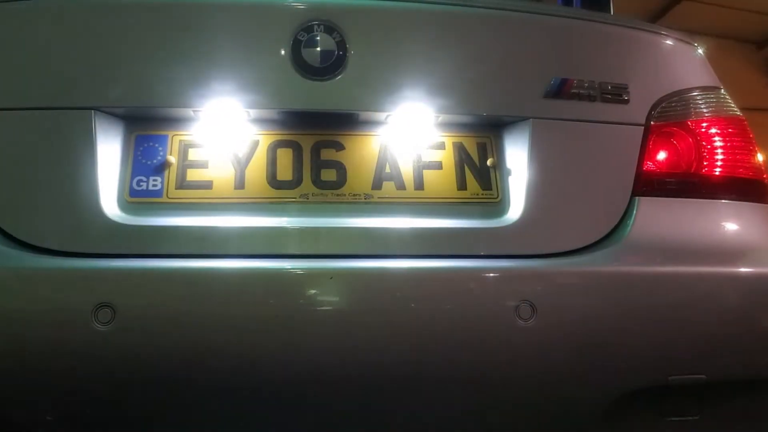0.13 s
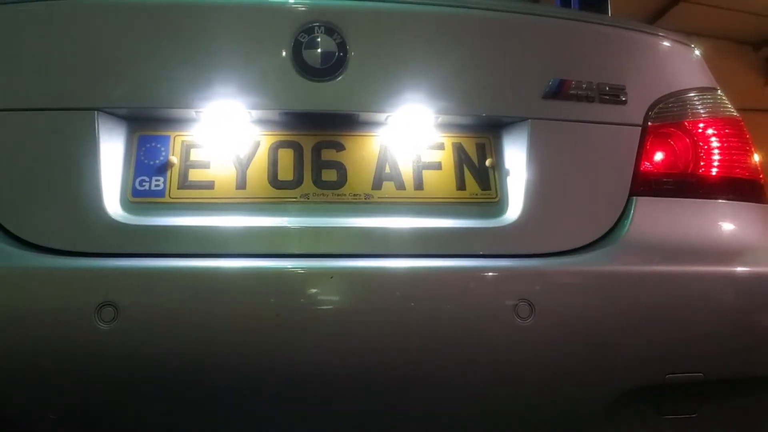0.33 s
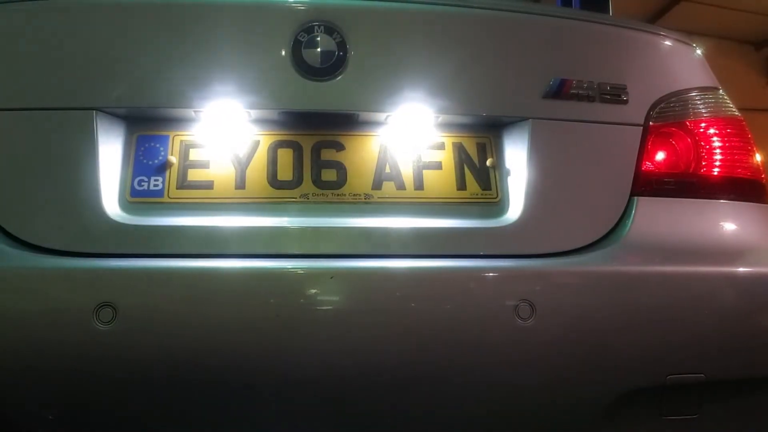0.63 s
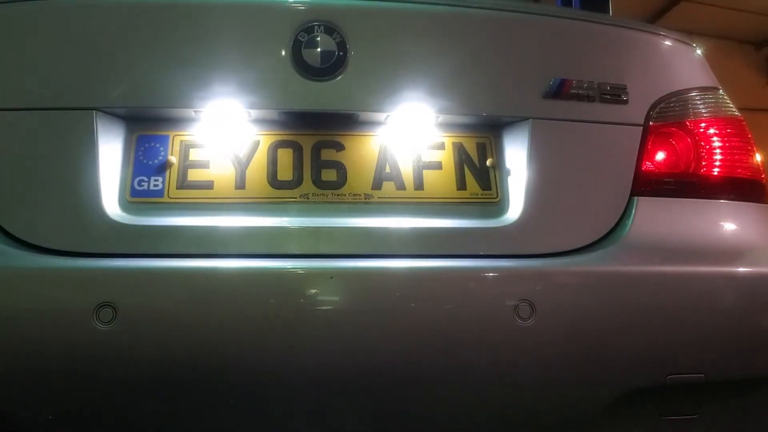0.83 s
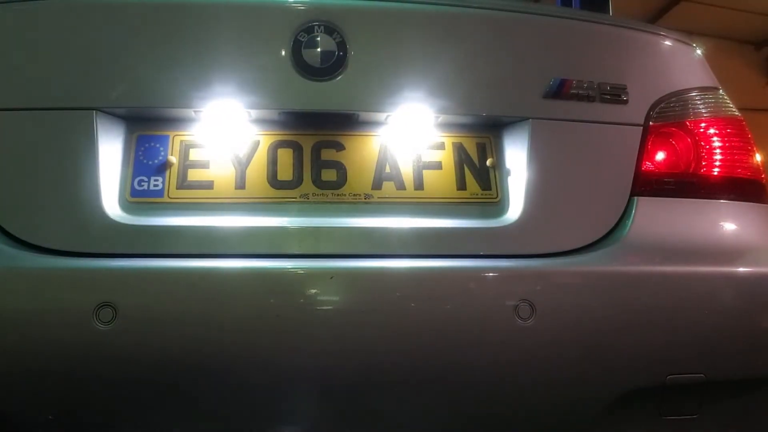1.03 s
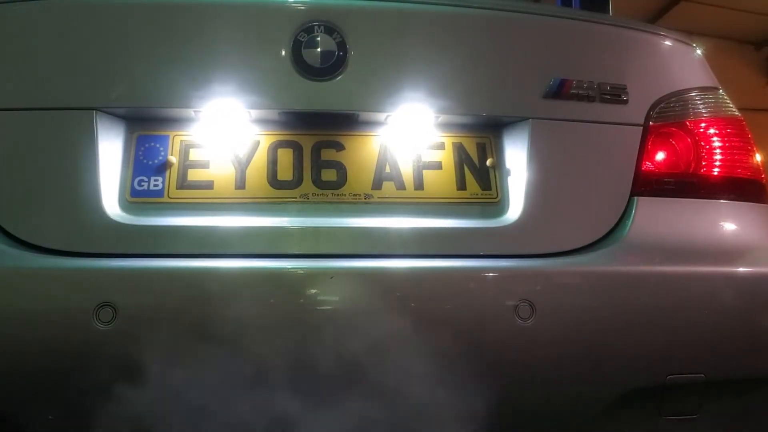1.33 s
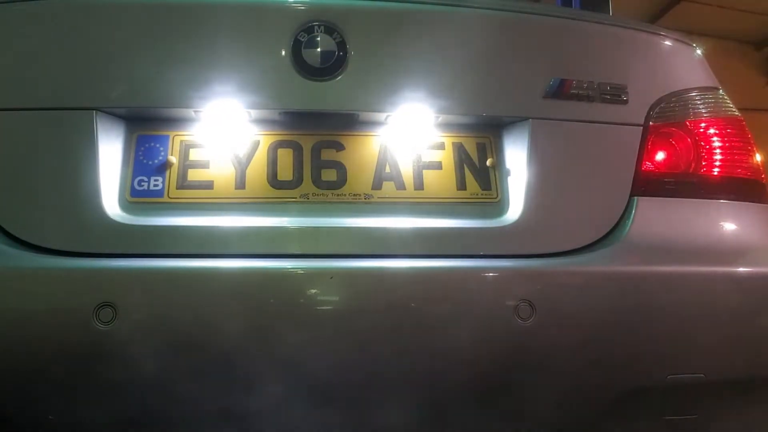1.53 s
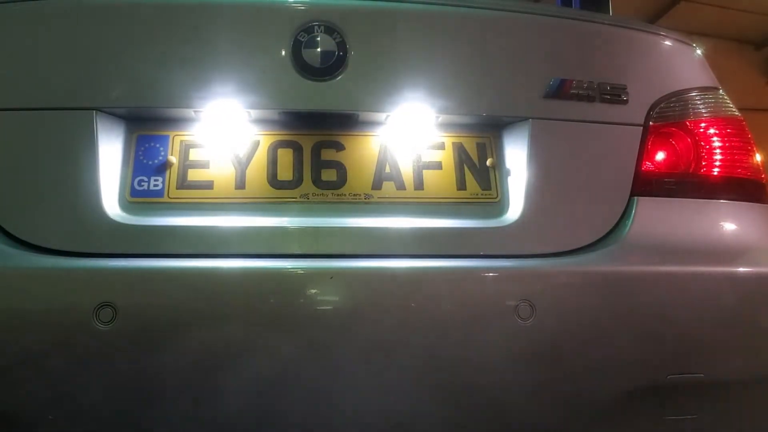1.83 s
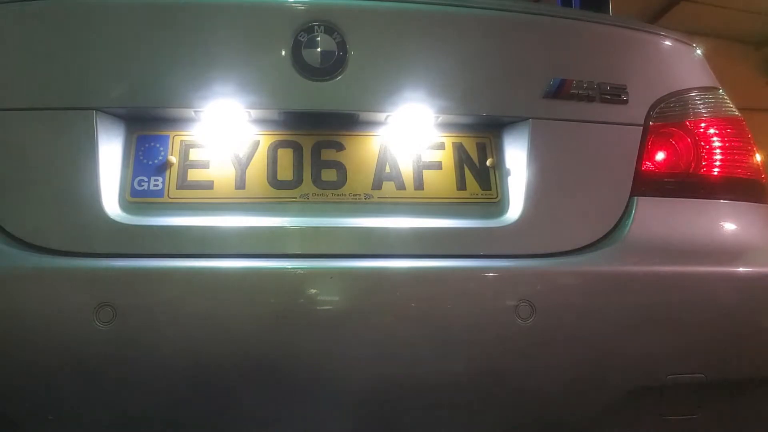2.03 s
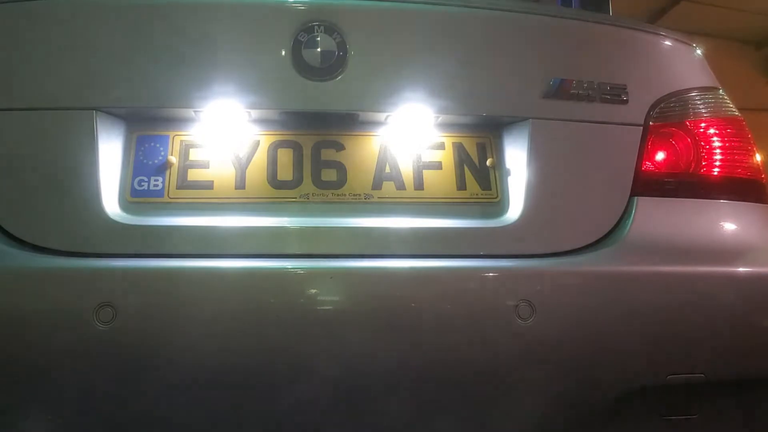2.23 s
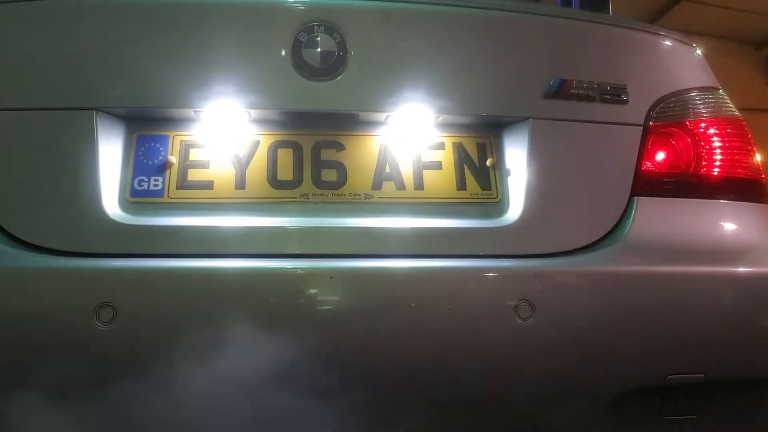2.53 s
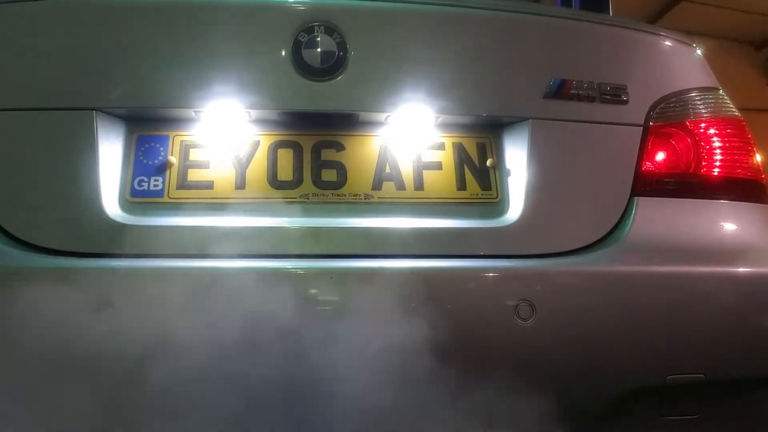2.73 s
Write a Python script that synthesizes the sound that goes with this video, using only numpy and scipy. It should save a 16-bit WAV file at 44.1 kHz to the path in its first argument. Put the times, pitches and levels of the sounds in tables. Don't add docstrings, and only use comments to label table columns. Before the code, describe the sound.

Deep car engine exhaust drone settles to a lumpy idle with small spitting cracks, then revs upward in steps to a growling, louder finish with bright pops, heard close at the rear near hard walls.

```python
import sys
import numpy as np
from scipy import signal
from scipy.fft import rfft, irfft, next_fast_len
from scipy.io import wavfile
from scipy.ndimage import uniform_filter1d, map_coordinates

SR = 44100
rng = np.random.default_rng(int(sys.argv[2]) if len(sys.argv) > 2 else 0)


def elevation(decibels):
    levels = np.asarray(decibels, float)
    return 10 ** (levels / 20)


def store_wav(level_fs):
    pcm = np.round(np.clip(np.atleast_2d(level_fs), -1, 1) * 32767)
    wavfile.write(sys.argv[1], SR, pcm.T.astype(np.int16))


N = 127449


def unit(x):
    return x / np.sqrt(np.mean(x ** 2) + 1e-20)


def along(points, hz):
    f, v = np.transpose(points)
    return np.interp(np.log(hz + 1), np.log(f + 1), v)


def curves(rows):
    s, *columns = np.transpose(rows)
    return [np.interp(np.arange(N) / SR, s, column) for column in columns]


def wobble(rate_hz):
    knots = rng.standard_normal(int(N * rate_hz / SR) + 4)
    return map_coordinates(knots, [np.arange(N) * rate_hz / SR])


def filtered(x, response):
    m = next_fast_len(N + SR // 2)
    return irfft(rfft(x, m) * response(np.fft.rfftfreq(m, 1 / SR)), m)[..., :N]


def resonance_gain(row, f):
    centre, width, db = row
    return abs(elevation(db) * 1j * f * width / (centre * centre - f * f + 1j * f * width))


def causal(gain):
    cepstrum = irfft(np.log(gain + 1e-6))
    half = len(cepstrum) // 2
    folded = np.r_[cepstrum[0], 2 * cepstrum[1:half], np.zeros(len(cepstrum) - half)]
    return np.exp(rfft(folded))


def strikes(table):
    s, db = np.transpose(table)
    return np.bincount((s * SR).astype(int), elevation(db), N)


def controls():
    # start_s [s], firing_rate_hz [Hz]
    speed = [(0.0, 74.76), (0.16, 65.55), (0.3, 61.37), (0.42, 57.97), (0.6, 58.05), (0.75, 59.26),
             (1.13, 56.89), (1.35, 65.14), (1.46, 68.83), (1.56, 70.68), (1.76, 72.48), (2.04, 80.34),
             (2.29, 80.15), (2.37, 85.86), (2.45, 88.83), (2.53, 90.32), (2.7, 97.6), (2.89, 113.8)]
    # start_s [s], gas_flow_db [dB], low_order_load_db [dB], bank_step_db [dB], unevenness_db [dB]
    engine = [(0.0, -31.5, -26, -27, -1), (0.15, -34.5, -31.5, -37.5, 6), (0.24, -32.5, -33.5, -21.5, 4.5),
              (0.41, -36, -33.5, -43, 8), (0.5, -34.5, -37, -34.5, 0), (0.72, -34.5, -30.5, -26.5, -3),
              (0.8, -34, -35, -43, 0), (1.05, -33.5, -33, -27, 6.5), (1.13, -34, -32.5, -41, 0),
              (1.27, -31, -26.5, -26, 5.5), (1.45, -31.5, -17, -33, 3.5), (1.7, -30, -12.5, -48, 5.5),
              (1.79, -28.5, -11, -27.5, -3.5), (2.03, -31, -9, -35.5, -2), (2.28, -29.5, -15, -33, -11),
              (2.39, -31, -16.5, -49.5, 0.5), (2.7, -25.5, -21, -37.5, -10),
              (2.89, -26, -18.5, -23.5, -2.5)]
    # start_s [s], twin_pipe_step_db [dB], throttle_growl_db [dB], third_order_boom_db [dB]
    twins = [(0, -8, -7.5, 0.5), (.14, 0, -1, -6), (.4, 0, -10, 4), (1.07, -0.5, -3.5, 4.5),
             (1.2, 0.5, -11, 6), (1.36, 2, 9, 1), (1.56, 1.5, -5.5, -1.5), (1.75, -4.5, -12.5, 4.5),
             (1.97, 4, 0.5, -2.5), (2.2, 3, 2, 1), (2.31, -4.5, -3, 4), (2.4, -1, 5.5, -4.5),
             (2.55, -7, 8, -2), (2.67, -2.5, 17, -5), (2.76, 0.5, 7, -0.5), (2.81, -8, 16.5, 1),
             (2.86, 0, 3, -11), (2.89, 0, 4, 2)]
    hz, = curves(speed)
    flow_db, load_db, step_db, uneven_db = curves(engine)
    drives_db = np.array([load_db + 21.0, step_db + 34.0, flow_db + 30.0, *curves(twins)])
    turns = np.cumsum(hz * (1 + .002 * wobble(14))) / SR
    return hz, flow_db, uneven_db, drives_db, turns


def pipe_gain(hz):
    # centre_hz [Hz], width_hz [Hz], peak_db [dB]
    pipe = [(99.5, 27, 14.5), (253, 75, 3), (301, 32, 5.5), (544.3, 18, 8), (634, 33, 7), (966, 280, 4)]
    dip_hz, dip_width_hz, dip_db = 165, 19, -10.5
    dip = elevation(dip_db * np.exp(-((hz - dip_hz) / dip_width_hz) ** 2))
    return dip * np.sqrt(1 + sum(resonance_gain(row, hz) ** 2 for row in pipe))


def drone(hz, drives_db, turns):
    # level_db [dB], then the share [dB per dB] of
    orders = [(-19, 0.92, -0.096, 0.038, 0, 0.024, 0), (-28, 0.06, 0, 0, 1, 0.098, 0),
              (-25, 0.41, 0, 0.078, 0, 0.23, 0.99), (-37.5, 0.33, .1, 0.54, .4, 0.42, 0),
              (-36.5, 0.19, 0.89, 0.016, -0.15, 0.052, 0), (-38, 0.27, -0.036, .3, 0.28, 0.72, 0),
              (-47.5, -0.3, -0.55, 0.64, -1, 0.36, 0), (-43.5, -0.086, 0.53, 0, 1, .1, 0),
              (-49.5, -0.61, -0.0091, 0.39, 0.69, 0.86, 0.17), (-45.5, -.14, 0.27, .28, 0, 0.016, 0.29),
              (-47, -.03, 0.18, 1.7, -0.64, 0, 0.062), (-49.5, 0.23, -0.68, 0.62, -0.079, 0.24, 0.18),
              (-48.5, 0.15, 0.9, 1.1, -1.1, 0, 0.34)]
    out = 0
    for k, (db, *shares) in enumerate(orders):
        order = k + 1
        level_db = db + np.dot(shares, drives_db) + 0.35 * min(order, 6) * wobble(23.9)
        lift = pipe_gain(hz * order) if k else 1
        phase = 2 * np.pi * order * turns + 0.16 * k * wobble(13) + 1.3 * k * k
        out = out + lift * elevation(level_db) * np.sin(phase)
    return out


def firings(turns, scatter_db):
    uneven = [1.5, -2.5, .7, -1.2, 2.2]
    at = np.flatnonzero(np.diff(np.floor(turns)))
    scatter = rng.uniform(-1.5, 1, 400)[:len(at)]
    x = np.zeros(N)
    x[at] = elevation(np.resize(uneven, len(at)) + scatter_db * scatter)
    return x


def burble(level_db, turns):
    x = firings(turns, scatter_db=6.5)
    x = x - (x > 0) * x[x > 0].mean()

    def low(f):
        rumble_cut = f ** 4 / (f ** 4 + 60 ** 4)
        dull = 1 / (1 + (f / 500) ** 2) / (1 + (f / 2500) ** 4)
        return causal(pipe_gain(f) * rumble_cut * dull)

    return elevation(level_db - 3.0) * unit(filtered(x, low))


def puffs(x, t60_s, click):
    # pitch_hz [Hz], correlation [-1..1]
    alike = [(60, 0.94), (200, 1), (550, 0.15), (1000, 0.67), (1900, 0.85), (3000, 0.69), (6000, 0.23),
             (12000, .7)]
    t = np.arange(SR // 20) / SR
    puff = elevation(-60 * t / t60_s) * (1 - np.exp(-t / 0.0002))
    gate = abs(signal.fftconvolve(x, puff)[:N])
    pair = gate * rng.standard_normal((2, N))
    pair[0] += click * uniform_filter1d(x, size=5) * 2

    def mid_and_side(f):
        angle = np.arccos(np.clip(along(alike, f), -1, 1)) / 2
        return np.array([np.cos(angle), np.sin(angle)])

    mid, side = filtered(pair, mid_and_side)
    return np.array([mid + side, mid - side])


def tips(f, ring_db=0):
    # centre_hz [Hz], width_hz [Hz], peak_db [dB]
    tip_rings = [(532.6, 80, -1.5), (905, 35, -1), (1182, 78, -3.5), (1535, 47, -5.5), (1891, 138, -3),
                 (2035, 34, -6.5), (2350, 25, -15), (2593, 470, -11.5), (3700, 100, -16.5),
                 (4660, 98, -40.5), (6320, 200, -39.5)]
    # pitch_hz [Hz], level_db [dB]
    tip_colour = [(50, -45.5), (250, -4), (1200, -14.5), (3100, -25), (3900, -32), (6500, -37.5),
                  (7800, -69.5), (15000, -97.5)]
    broad = elevation(2 * (along(tip_colour, f) - 3))
    rings = sum(resonance_gain(row, f) ** 4 for row in tip_rings)
    return causal(np.sqrt(broad + elevation(2 * ring_db) * rings))


def rasp(flow_db, turns):
    # start_s [s], peak_db [dB]
    cracks = [(0.038, -24), (0.081, -23.5), (0.123, -15), (0.199, -23), (0.59, -25.5), (0.607, -28.5),
              (0.695, -24.5), (0.829, -27), (0.845, -23), (0.917, -23.5), (1.015, -27), (1.192, -23.5),
              (1.557, -19.5), (2.644, -20), (2.7125, -16.5), (2.809, -14.5), (0.1676, -27), (0.8103, -29),
              (0.8611, -23), (1.07, -26), (1.1564, -25), (1.273, -15.5), (1.3224, -18.5), (1.3493, -20),
              (1.4707, -31.5), (1.5434, -25), (1.6397, -17.5), (1.6834, -16.5), (1.8174, -16.5),
              (1.8867, -25), (1.9719, -22.5), (2.152, -16.5), (2.1844, -18.5), (2.2233, -19.5),
              (2.3209, -17.5), (2.4428, -14), (2.5247, -23), (2.5876, -35.5), (2.6316, -15.5),
              (2.7018, -12), (2.7429, -23), (2.79, -17.5), (2.8354, -24)]
    # start_s [s], peak_db [dB]
    pops = [
        (0.123, -50.5),
        (2.7032, -31.5),
        (2.7135, -45.5),
        (2.79, -23.5),
    ]
    bursts = unit(puffs(firings(turns, scatter_db=4.5), 0.048, click=3.5))
    rush = unit(puffs(np.ones(N) / 100, 0.0061, click=0)) * elevation(0.33 * wobble(12))
    gas = filtered(bursts, tips) + filtered(rush, lambda f: tips(f, ring_db=-1.5))
    body = elevation(flow_db + 3.0) * unit(gas)

    def thin_tips(f):
        return tips(f, ring_db=8.5) * (1j * f / (700 + 1j * f)) ** 2

    def bright(f):
        return causal(f ** 2 / (f ** 2 + 1800 ** 2) / (1 + (f / 4200) ** 2) / (1 + (f / 13500) ** 8))

    crack = elevation(13) * filtered(puffs(strikes(cracks), 0.036, click=6.25), thin_tips)
    pop = elevation(8.0) * filtered(puffs(strikes(pops), 0.027, click=2.5), bright)
    return body + crack + pop


def walls(x):
    # pitch_hz [Hz], t60_s [s]
    wall_decay = [(100, 0.12), (1500, 0.25), (10000, 0.064)]
    hz, t, z = signal.stft(rng.standard_normal((2, SR // 4)), SR, nperseg=256)
    fade = elevation(-60 * t / along(wall_decay, hz)[:, None])
    tail = signal.istft(z * fade, SR, nperseg=256)[1]
    late = np.pad(x, ((0, 0), (350, 0)))
    return signal.fftconvolve(late, tail / np.linalg.norm(tail[0]), axes=1)[:, :N]


def air(load_db):
    # pitch_hz [Hz], level_db [dB per Hz]
    hiss_colour = [(7600, -41.5), (8300, -11.5), (9300, 7), (11500, 3), (13500, -9), (15000, -9)]
    hiss = unit(filtered(rng.standard_normal((2, N)), lambda f: elevation(along(hiss_colour, f)) * (f > 7000)))
    deep = unit(filtered(rng.standard_normal(N), lambda f: f / (1 + (f / 55) ** 4)))
    hiss_db = -67 + 0.22 * load_db + 1.5 * wobble(4.1)
    rumble_db = -49.5 + 0.27 * load_db + 2.5 * wobble(13.0)
    return elevation(hiss_db) * hiss + elevation(rumble_db) * deep


def scene():
    hz, flow_db, uneven_db, drives_db, turns = controls()
    low = drone(hz, drives_db, turns)
    rough = rasp(flow_db, turns) + burble(flow_db + uneven_db, turns)
    answer = elevation(-12.0) * walls(rough) + elevation(-26.5) * walls(np.array([low, low]))
    return low + rough + answer + air(drives_db[0])


def low_pass(x):
    return signal.sosfilt(signal.butter(12, 14800, fs=SR, output="sos"), x)


def record(dry):
    # pitch_hz [Hz], level_db [dB]
    lean = [(60, 0), (300, .5), (1000, -1), (2500, 2.5), (5500, 2), (8500, -3.5), (12000, -9)]
    lag_s = .00009
    side = np.array([[.5], [-.5]])

    def ports(f):
        return elevation(side * along(lean, f)) * np.exp(-2j * np.pi * f * lag_s * side)

    return low_pass(filtered(dry, ports))


dry = scene()
out = record(dry)
store_wav(out)
```